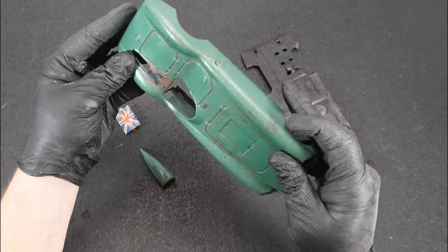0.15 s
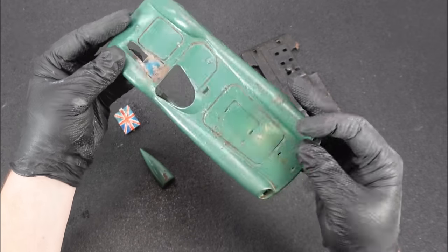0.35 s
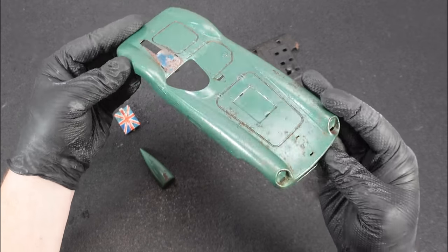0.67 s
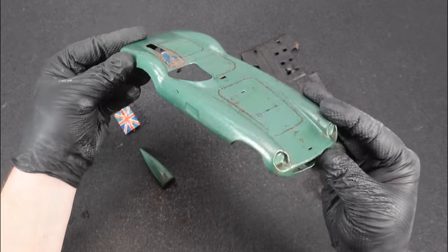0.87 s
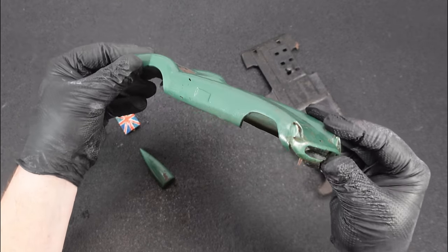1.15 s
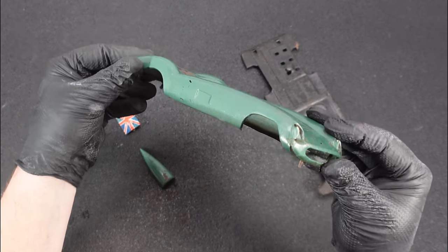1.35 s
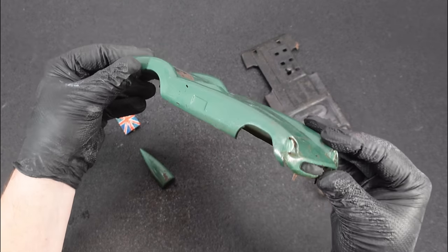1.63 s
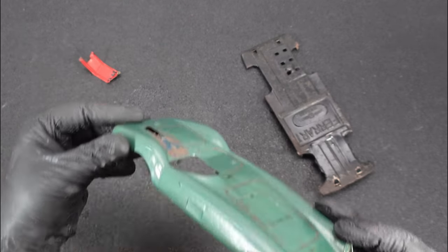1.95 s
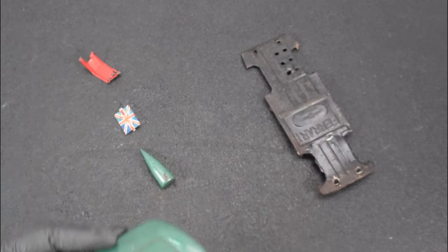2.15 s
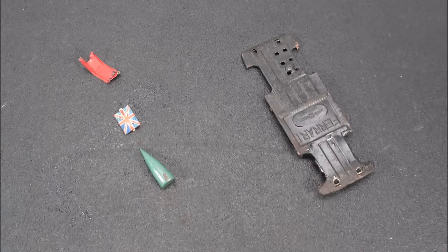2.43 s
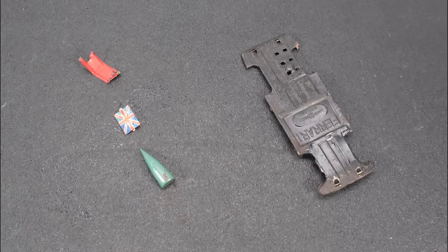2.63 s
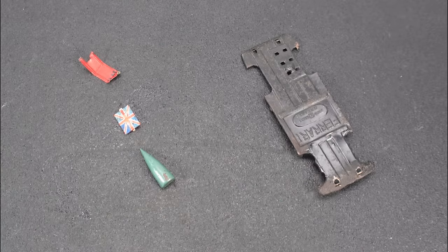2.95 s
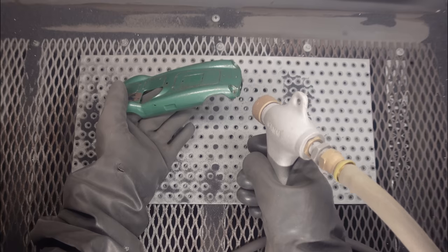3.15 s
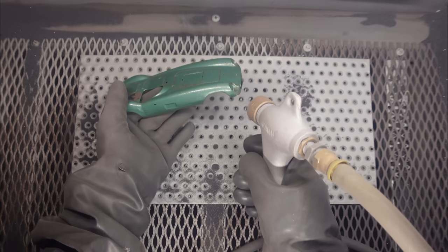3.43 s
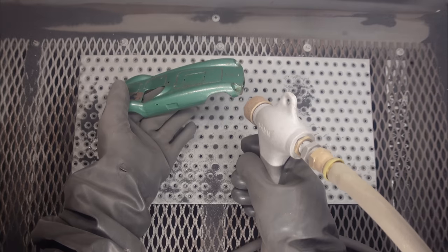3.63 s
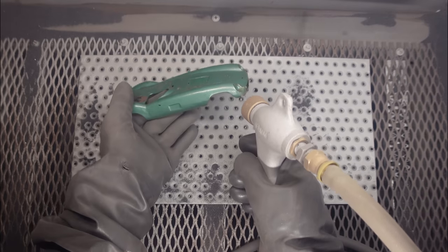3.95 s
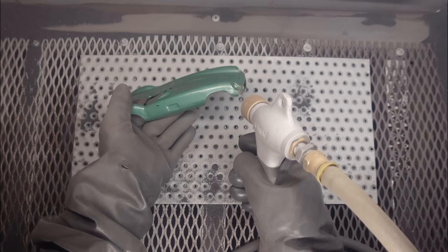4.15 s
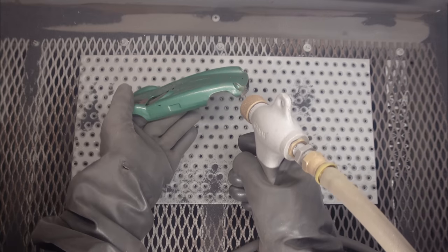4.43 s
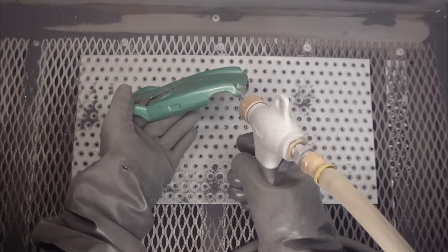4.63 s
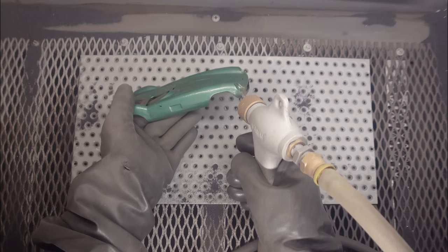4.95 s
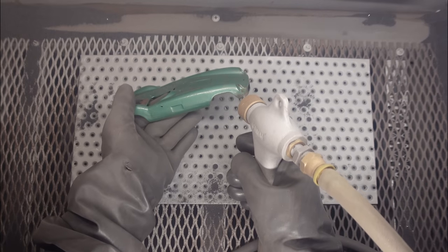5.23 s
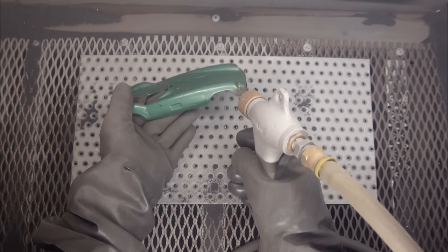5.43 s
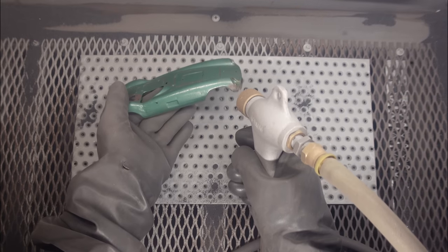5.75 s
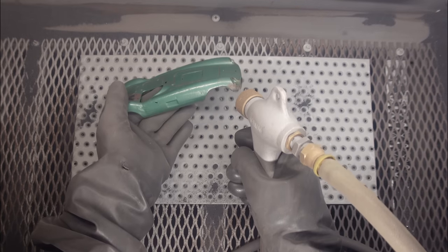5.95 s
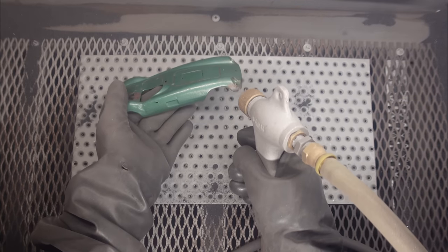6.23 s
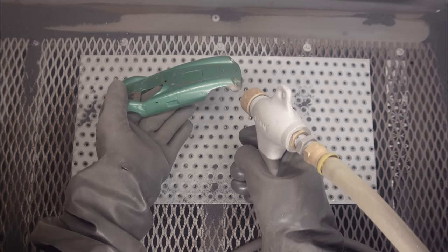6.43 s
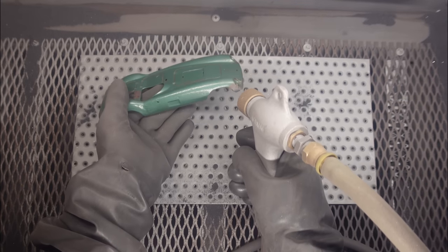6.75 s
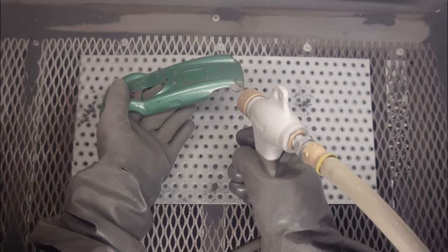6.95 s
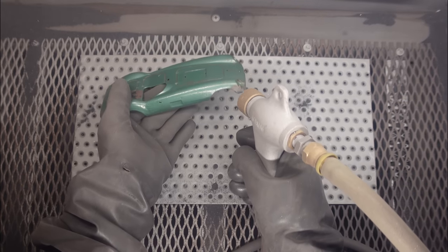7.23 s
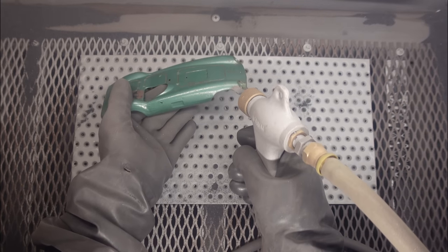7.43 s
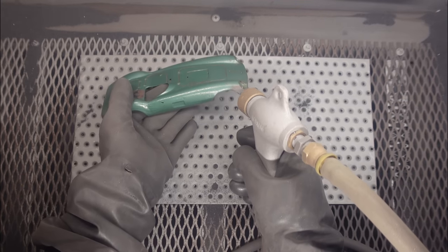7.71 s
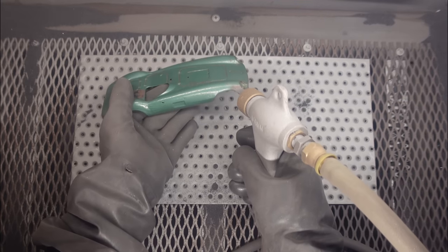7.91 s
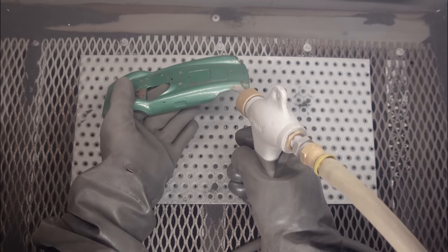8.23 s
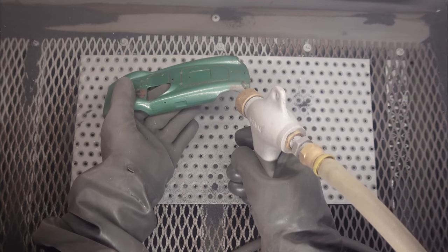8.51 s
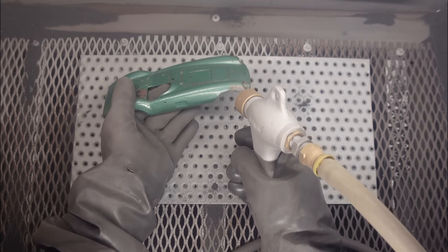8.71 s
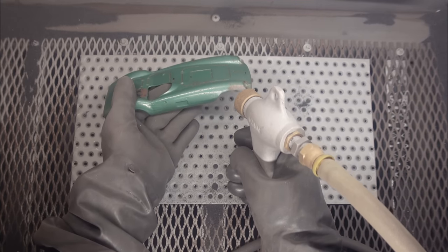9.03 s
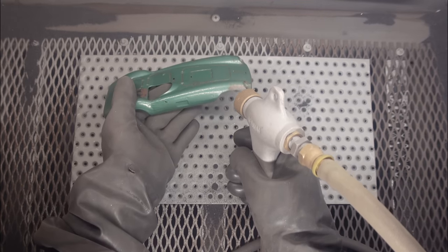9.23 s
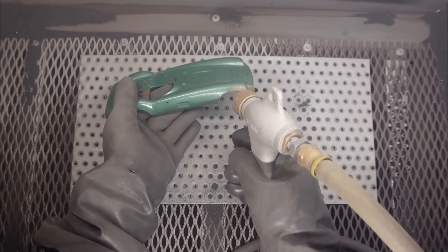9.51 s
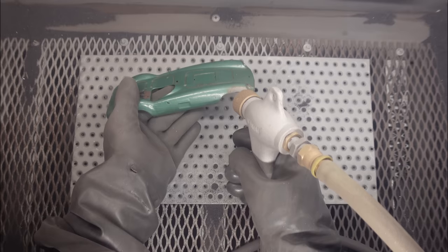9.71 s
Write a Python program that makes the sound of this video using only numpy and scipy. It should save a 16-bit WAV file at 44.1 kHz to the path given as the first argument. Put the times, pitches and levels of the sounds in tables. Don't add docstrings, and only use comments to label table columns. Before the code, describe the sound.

Close to the microphone in a quiet workshop, gloves rub and scrape a hollow tin shell, with dry ticks and faint short rings, a near-silent lull, then a sharper clack. Abruptly a blast gun's dense, bright hiss takes over inside a steel cabinet, steady to the end, with resonant metal colour and a constant extractor whine. Both channels are identical.

```python
import sys
import numpy as np
from scipy import signal
from scipy.fft import rfft, irfft
from scipy.io import wavfile

SR = 44100
rng = np.random.default_rng(int(sys.argv[2]) if len(sys.argv) > 2 else 0)


def transcribe(signal):
    frames = np.atleast_2d(signal).T
    limited = np.clip(frames, -1, 1)
    pcm = np.round(limited * 32767).astype(np.int16)
    wavfile.write(sys.argv[1], SR, pcm)


def to_linear_factor(level_db):
    exponent = np.asarray(level_db, float) / 20
    return 10 ** exponent


N = 435266
HZ = np.fft.rfftfreq(N, 1 / SR) + 1e-3
CUT_S = 3.1405

# (frequency [Hz], width [Hz], level [dB])
TIN_MODES = [(402, 30, 4.5), (600, 39, 1), (988, 20, -1.5), (1500, 55, -4), (2220, 27, 5.5),
             (2830, 65, -10), (3190, 21, -14), (3460, 24, -13), (3870, 23, -4), (4350, 67, -4.5),
             (4670, 26, 3), (5060, 59, 1), (5600, 100, -11.5), (5880, 42, -4), (6100, 18, -15),
             (7100, 47, -8), (7030, 31, -38), (7550, 57, -23), (7860, 18, -32), (8070, 34, -16),
             (8100, 25, -2), (8800, 15, 3), (8950, 50, -17), (9900, 17, -8)]


def rms_one(x):
    return x / np.sqrt(np.mean(x ** 2) + 1e-20)


def in_time(rows):
    s, *columns = np.transpose(rows)
    return [np.interp(np.arange(N) / SR, s, column) for column in columns]


def colour(points):
    hz, level_db = np.transpose(points)
    return to_linear_factor(np.interp(np.log(HZ), np.log(hz), level_db))


def band(low_hz, high_hz, order=6):
    return 1 / np.sqrt((1 + (low_hz / HZ) ** (2 * order)) * (1 + (HZ / high_hz) ** (2 * order)))


def mode(hz, width_hz):
    return 1 / (1 + 1j * (HZ - hz ** 2 / HZ) / width_hz)


def through(x, response):
    return irfft(rfft(x) * response, N)


def resonate(x, hz, width_hz):
    r = np.exp(-np.pi * width_hz / SR)
    zeros = (1 - r * r) / 2 * np.array([1, 0, -1])
    poles = [1, -2 * r * np.cos(2 * np.pi * hz / SR), r * r]
    return signal.lfilter(zeros, poles, x)


def drift(rate_hz):
    return rms_one(through(rng.standard_normal(N), 1 / (1 + (HZ / rate_hz) ** 2) * (HZ > 0.05)))


def grains(per_s, spread_db):
    sizes = to_linear_factor(spread_db * np.minimum(rng.exponential(1, N), 5)) * rng.choice([-1, 1], N)
    return rms_one(sizes * (rng.random(N) < per_s / SR))


def box(t60, low_hz, wall_share):
    echoes = rng.standard_normal(N) * to_linear_factor(-60 * np.arange(N) / SR / t60)
    absorbing = band(low_hz, 30000, order=2)
    wash = rfft(echoes / np.sqrt(np.sum(echoes ** 2))) * absorbing
    return (1 + wall_share * wash) / np.sqrt(1 + (wall_share * absorbing) ** 2)


def rubbing():
    # (time [s], pressure as level [dB], sliding speed as treble tilt [dB])
    grip = [(0.0, -46.5, 6), (0.287, -45, 0), (0.294, -36.5, -5.5), (0.44, -44.5, 0), (0.69, -46.5, -2.5),
            (0.71, -49.5, 3), (0.8, -42, 1), (0.98, -46, 1.5), (1.16, -51, 1), (1.22, -55.5, -1),
            (1.37, -69, -3), (1.62, -67, -4), (1.8, -59, 0.5), (2.44, -53, -0.5), (2.79, -50, -2.5),
            (2.84, -59.5, -1), (3.02, -41.5, 1.5), (3.135, -45.5, 1)]
    edges_hz = [300, 1300, 3500, 6200, 11000, 15600]
    # (level at mean pressure [dB], share of pressure swing [dB/dB], share of tilt [dB/dB])
    friction = [
        (-53, 0.71, -1.1),
        (-49.5, 0.94, -0.45),
        (-53.5, 1, 1.1),
        (-51, 1.1, 0.6),
        (-63, 1.44, 0.98),
    ]
    mean_grip_db = -50
    grip_db, tilt_db = in_time(grip)
    swing_db = grip_db - mean_grip_db

    scratch = through(grains(9000, spread_db=1.0), 1 / (1 + 1j * HZ / 7000))
    ringing = np.zeros(N)
    for hz, width, db in TIN_MODES:
        ringing += to_linear_factor(db + 4 * drift(7)) * through(scratch, mode(hz, width))
    ring_db = np.minimum(-6.5 + 0.78 * swing_db, 4) - 2
    contact = rms_one(scratch) + to_linear_factor(ring_db) * rms_one(ringing)

    out = np.zeros(N)
    notch = 1 - 0.5 * mode(7060, 1300)
    for (db, follows, tilts), low, high in zip(friction, edges_hz, edges_hz[1:]):
        level_db = db + follows * swing_db + tilts * tilt_db
        roughness_db = 2.05 * drift(32) - 2.5
        out += to_linear_factor(level_db + roughness_db) * rms_one(through(contact, band(low, high) * notch))
    return out


def contacts():
    # (time [s], level [dB], frequency [Hz], hold [s])
    rings = [(.0, -51, 3270, .11), (.289, -44, 1500, .024), (0.316, -25.5, 8770, 0.0074),
             (.317, -28, 630, 0.0058), (0.318, -30, 3870, .013), (0.315, -32, 5600, .006),
             (0.331, -35, 2237, .017), (0.557, -44, 1500, .01), (0.565, -46, 312, 0.035),
             (.567, -43, 2270, .01), (0.569, -46, 2970, .012), (0.618, -33, 2990, .037),
             (.631, -33.5, 2200, 0.022), (0.627, -39, 1500, 0.011), (.64, -41, 3500, .025),
             (0.749, -46, 1052, 0.18), (0.768, -40.5, 2280, 0.023), (.771, -56, 400, 0.2),
             (0.897, -41, 2090, 0.019), (1.11, -48.5, 244, .09), (2.054, -61, 1010, .095),
             (2.734, -47, 1630, 0.031), (2.745, -47, 2870, .03), (2.753, -39, 3840, 0.019),
             (3.008, -39, 1673, 0.065), (3.015, -38, 8800, .038), (3.017, -32, 3190, 0.037),
             (3.023, -44.5, 598, 0.041), (3.024, -45, 820, .045), (3.05, -33, 5480, 0.017)]
    # (time [s], level [dB], frequency [Hz], hold [s], t60 [s])
    skids = [(.291, -36, 3380, 0.042, .04), (.292, -34.5, 8000, .032, .04), (.316, -24, 4500, .003, .05),
             (.549, -36.5, 8500, .025, .09), (.55, -34.5, 4800, 0.018, .12), (.78, -37.5, 3100, 0.056, .08),
             (1.077, -47.5, 5700, 0.072, .15), (1.625, -47.5, 5150, .018, 0.34),
             (1.632, -49.5, 8500, .015, .2), (1.66, -59, 3200, .03, .1), (2.032, -57, 7900, .08, .1),
             (2.406, -50, 5770, .03, .15), (2.749, -38, 5100, .009, .06), (2.842, -39, 3620, .006, 0.19),
             (2.999, -34.5, 3140, .06, .05), (3.025, -33, 4050, .036, .08), (3.062, -36, 4000, .012, .08)]
    # (time [s], level [dB], frequency [Hz], hold [s])
    scrapes = [(.291, -34, 5000, 0.026), (.316, -40, 6000, .03), (0.321, -25, 5000, .004),
               (0.366, -43, 9000, .06), (0.55, -43, 2500, .03), (0.613, -40, 7000, 0.031),
               (.63, -43, 13500, .03), (0.631, -36, 2600, .026), (0.748, -37, 2000, 0.086),
               (0.764, -42, 7000, 0.084), (0.774, -41, 3070, .057), (0.797, -36, 3000, .001),
               (0.883, -43.5, 5500, .08), (1.062, -35, 7500, .001), (1.098, -46, 12000, .04),
               (1.636, -57, 4000, 0.12), (1.782, -51.5, 895, .1), (2.028, -46, 4800, .004),
               (2.18, -57, 7000, .06), (2.385, -53, 10000, .04), (2.61, -49, 5000, 0.045),
               (2.718, -43.5, 4500, 0.05), (2.844, -49, 5000, 0.033), (2.869, -49, 8000, .03),
               (2.94, -55, 3000, .04), (3.021, -32, 6000, .043), (3.022, -35, 13000, 0.032),
               (3.023, -24, 5500, 0.0022), (3.024, -32, 3300, 0.046)]
    touches = [(s, db, hz, 14 + 0.018 * hz, hold, 0.075) for s, db, hz, hold in rings]
    touches += [(s, db, hz, 0.15 * hz, hold, t60) for s, db, hz, hold, t60 in skids]
    touches += [(s, db, hz, 0.6 * hz, hold, 0.012 + 1.4 * hold) for s, db, hz, hold in scrapes]
    return touches


def slips():
    out, age, touches = np.zeros(N), np.arange(SR // 2) / SR, contacts()
    size = (len(touches), len(age))
    draws = rng.standard_normal(size) * to_linear_factor(2.6 * rng.exponential(1, size))
    for (s, level_db, hz, width, hold, t60), scratch in zip(touches, draws):
        onset = np.tanh(age / (0.04 * hold + 1e-4))
        shape = to_linear_factor(level_db - 60 * np.maximum(age - hold, 0) / t60) * onset
        sound = resonate(shape * scratch, hz, width)
        sound = resonate(sound, hz, min(5.2 * width, 12000))
        push_rms = np.sqrt(np.mean(shape ** 2))
        out[round(s * SR):][:len(age)] += rms_one(sound) * push_rms
    shell = sum(to_linear_factor(db) * mode(hz, width) for hz, width, db in TIN_MODES)
    return through(out, 0.9 + 0.5 * shell)


def workshop():
    # (frequency [Hz], level per Hz [dB])
    room_tone = [(12, -32), (20, 2), (70, -15), (106, -9.5), (144, -18), (175, -17), (266, -17), (404, -22),
                 (439, -24.5), (834, -26.5), (15500, -43.5)]
    tone = to_linear_factor(-49) * rms_one(through(rng.standard_normal(N), colour(room_tone)))
    whine = to_linear_factor(-71) * rms_one(through(rng.standard_normal(N), mode(820, 9.4)))
    hum = to_linear_factor(-58) * rms_one(through(rng.standard_normal(N), mode(122.3, 9.2)))
    return tone + whine + hum


def sway():
    # (time [s], level [dB])
    air_motion = [(0.0, -40), (0.66, -43), (1.04, -53.5), (2.69, -61), (3.38, -44), (4.15, -49),
                  (4.89, -48), (5.77, -48.5), (6.87, -42.5), (8.33, -52), (8.96, -44), (9.87, -50)]
    white = rng.standard_normal(N)
    slow = rms_one(through(white, band(2.5, 19.5, order=2)))
    throb = rms_one(through(white, band(12, 24, order=2)))
    return to_linear_factor(in_time(air_motion)[0] - 1) * np.where(np.arange(N) < CUT_S * SR, slow, throb)


def jet():
    # (frequency [Hz], level per Hz [dB])
    spectrum = [(35, -53), (60, -17.5), (215, -13.5), (291, -4), (376, -7.5), (572, -3.5), (627, -4.5),
                (1070, -6.5), (1290, -6), (1590, -9), (1740, -5.5), (2840, -11), (4740, -7.5), (12600, -11),
                (15500, -17)]
    # (frequency [Hz], width [Hz], lift [dB])
    resonances = [(20, 4, 5), (91.5, 6.9, 5.5), (120, 5.3, 2.5), (159, 13.5, 5), (254, 17, 3.5),
                  (285, 33, 3), (332.5, 11, 5.5), (400, 10, 3), (444, 14, 4.5), (541, 19, 6), (565, 25, -3),
                  (630, 20, -3.5), (674, 28, 3), (802, 23, 4.5), (990, 3.9, 8.5), (1287, 105, 5),
                  (1746, 43, 1.5), (2070, 33, 4.5), (2230, 48, 3), (2340, 45, 3), (3700, 360, 1.5),
                  (4500, 140, 0.5), (9460, 28, 7.5), (10090, 48, 5), (11000, 28, 1)]
    # (time [s], flow about its mean [dB])
    flow = [
        (3.15, 0),
        (4.0, -2),
        (4.93, -0.5),
        (5.62, -0.25),
        (6.44, 1),
        (6.55, 0),
        (8.18, 0.8),
        (8.97, -.5),
        (9.87, 0.6),
    ]
    # (mean level [dB], share of flow swing [dB/dB], surplus of the jet before it meets the shell [dB], fade [s])
    parts = [
        (-29.5, 0.84, 3, 0.07),
        (-28.5, 0.98, 2, 0.41),
        (-33, 0.73, 4, 0.98),
    ]
    part_bands = (band(10, 2480), band(2575, 6590), band(8700, 16400))

    lift = 1 + sum((to_linear_factor(db) - 1) * mode(hz, width) for hz, width, db in resonances)
    air = rng.standard_normal((2, N)) + 0.2 * grains(5000, spread_db=2.0)
    pose = np.pi / 4 * (1 + np.tanh(0.81 * drift(0.2)))
    moved = np.cos(pose) * through(air[0], box(0.21, 4700, wall_share=0.43))
    moved += np.sin(pose) * through(air[1], box(0.21, 4700, wall_share=0.43))
    sound = through(moved, box(0.35, 700, wall_share=0.3) * colour(spectrum) * lift)

    out = np.zeros(N)
    flutter_db = 0.073 * drift(1.9)
    flow_db = in_time(flow)[0]
    since_s = np.maximum(np.arange(N) / SR - CUT_S, 0)
    for (db, follows, surplus_db, fade_s), part_band in zip(parts, part_bands):
        level_db = db + follows * flow_db + surplus_db * np.exp(-since_s / fade_s)
        level_db += flutter_db + 0.36 * drift(5.4) - 1.44
        out += to_linear_factor(level_db) * rms_one(through(sound, part_band))
    return out


def panel():
    # (frequency [Hz], width [Hz], nearest time [s], level then [dB], loss per second away [dB/s])
    panels = [(4500, 720, 3.06, -36, 14), (4574, 260, 9.4, -44, -1), (3640, 200, 8.1, -43.5, 0.5),
              (13600, 1800, 3.4, -43, 7), (8700, 130, 9.4, -43.5, 4.5), (9780, 150, 5, -47, 1.5),
              (12300, 500, 4.6, -50, 6.5), (8500, 930, 4.9, -42.5, 0.5), (10680, 150, 7.1, -52, -1)]
    now = np.arange(N) / SR
    out = np.zeros(N)
    for hz, width, s, db, loss_db in panels:
        ringing = rms_one(through(rng.standard_normal(N), mode(hz, width) ** 2))
        out += to_linear_factor(db - loss_db * np.abs(now - s)) * ringing
    return out


def motor():
    # (order of the shaft rate [1], level [dB])
    orders = [(1, -43), (2, -44), (5, -56), (6, -43), (12, -50), (18, -47), (22, -52), (24, -54), (25, -59),
              (36, -59)]
    shaft_hz = 290.87 + 0.07 * drift(0.48)
    phase = 2 * np.pi * np.cumsum(shaft_hz) / SR
    out = np.zeros(N)
    for order, db in orders:
        level = np.sqrt(2) * to_linear_factor(db + 1.3 * drift(5))
        out += level * np.sin(order * phase + rng.uniform(0, 6))
    return out


def scene():
    after = np.clip((np.arange(N) / SR - CUT_S) / 0.0013, 0, 1)
    bench = through(rubbing() + slips(), box(0.13, 900, wall_share=0.6)) + workshop()
    air = sway()
    cabinet = jet() + panel() + motor()
    mono = (1 - after) * bench + after * cabinet + air
    return np.array([mono, mono])


def roll_off(x):
    return signal.sosfilt(signal.butter(12, 15790, fs=SR, output="sos"), x)


def record(dry):
    limited = np.array([through(channel, band(1, 15745, order=300)) for channel in dry])
    return roll_off(limited)


dry = scene()
out = record(dry)
transcribe(out)
```